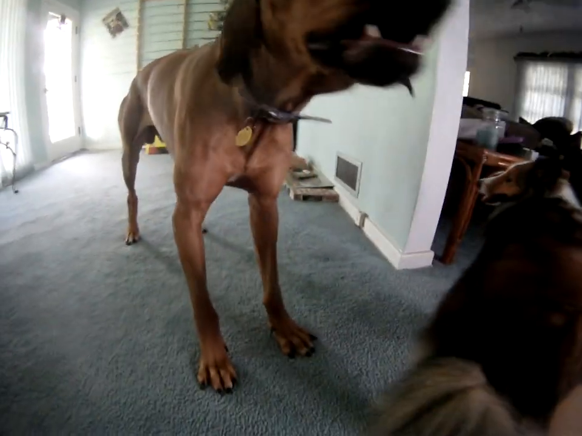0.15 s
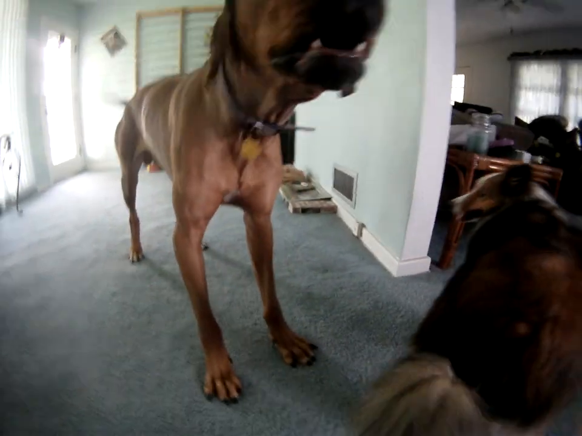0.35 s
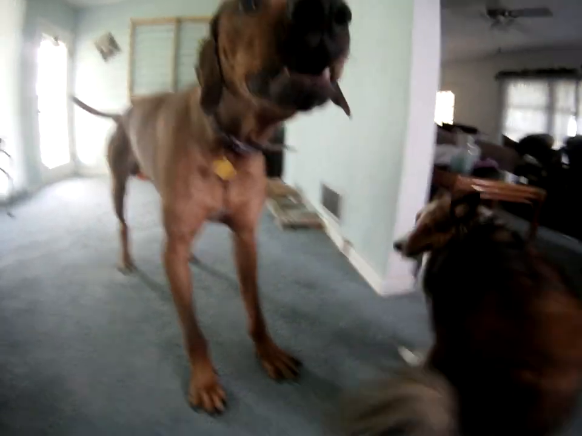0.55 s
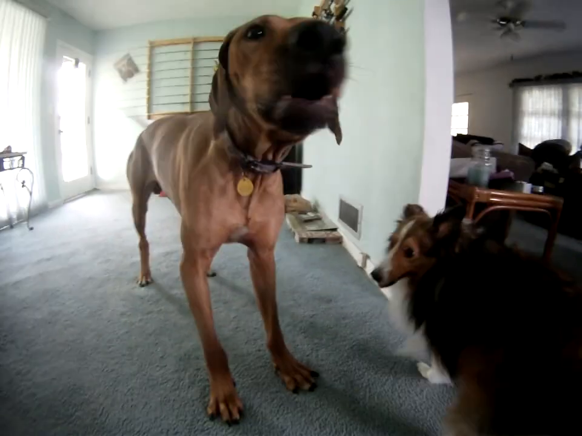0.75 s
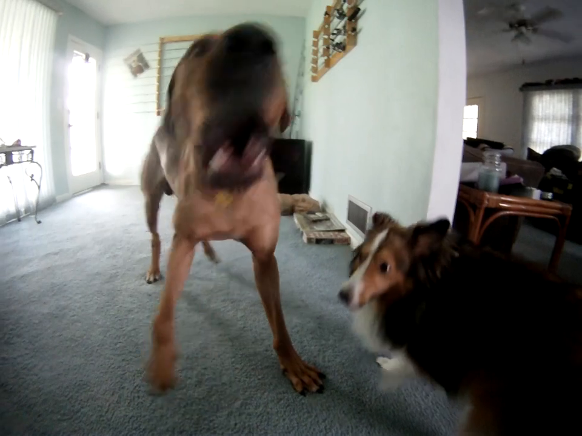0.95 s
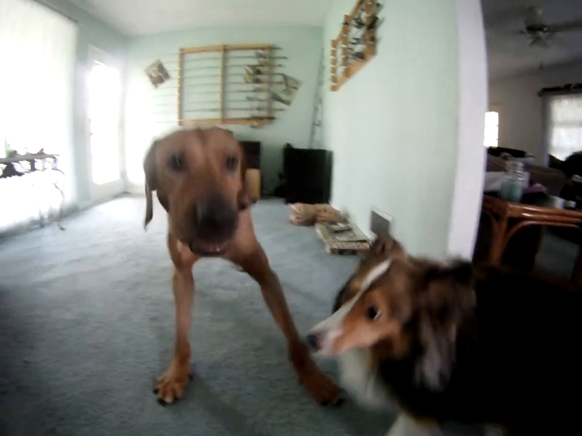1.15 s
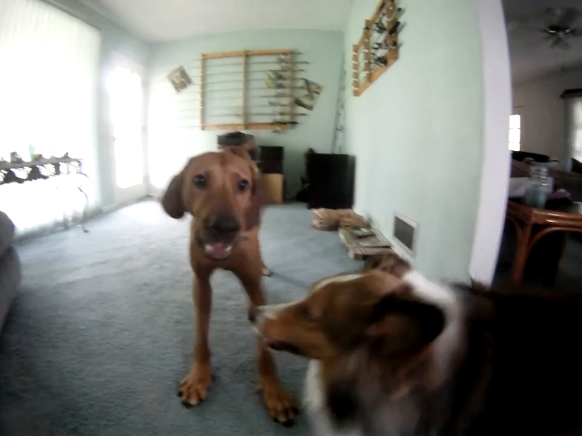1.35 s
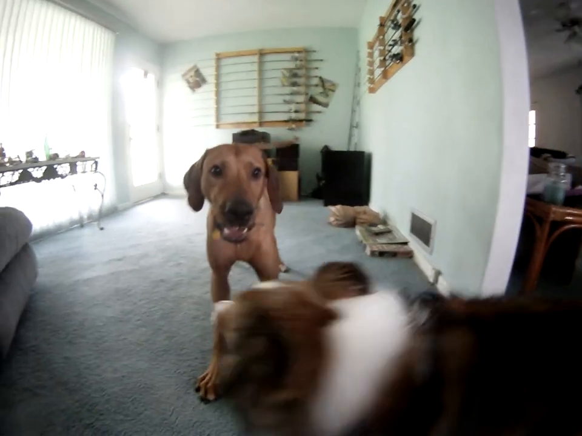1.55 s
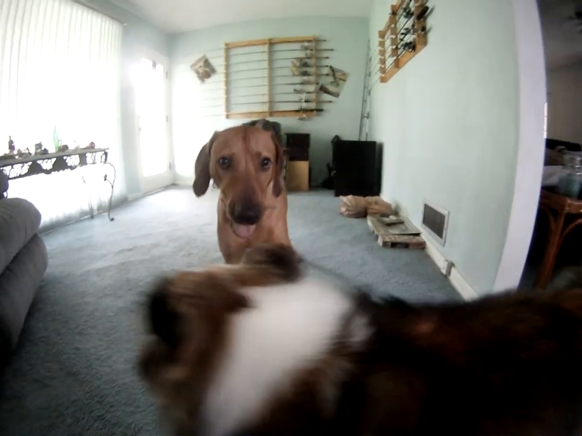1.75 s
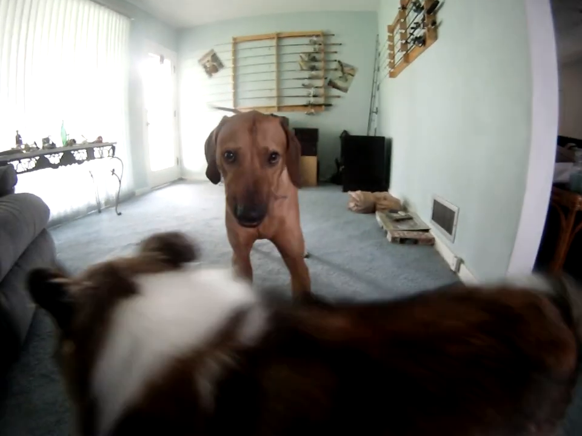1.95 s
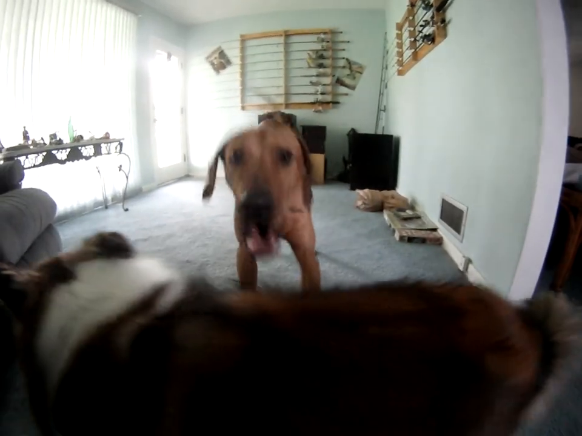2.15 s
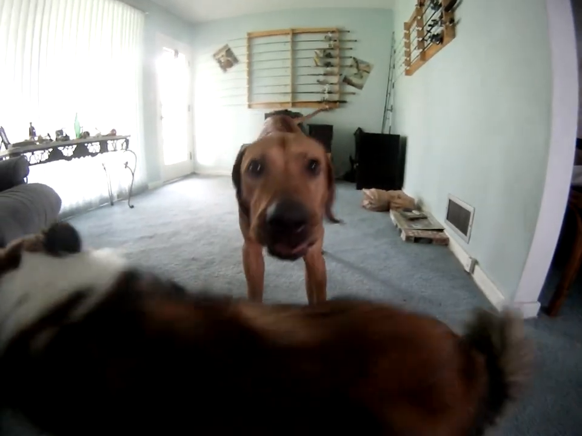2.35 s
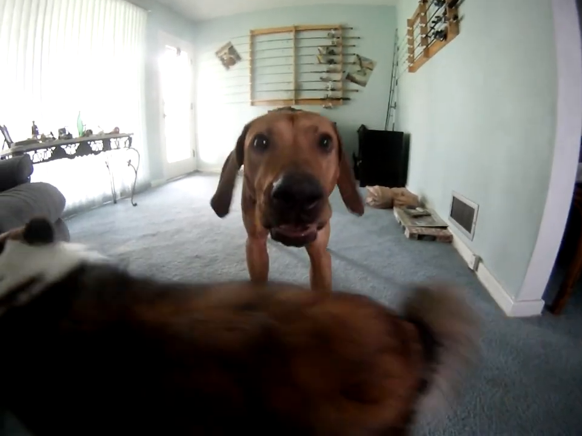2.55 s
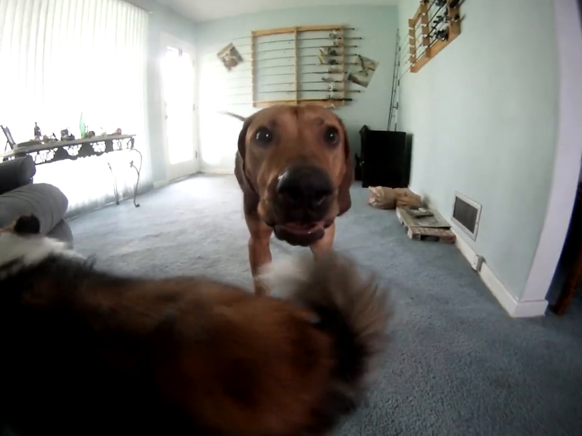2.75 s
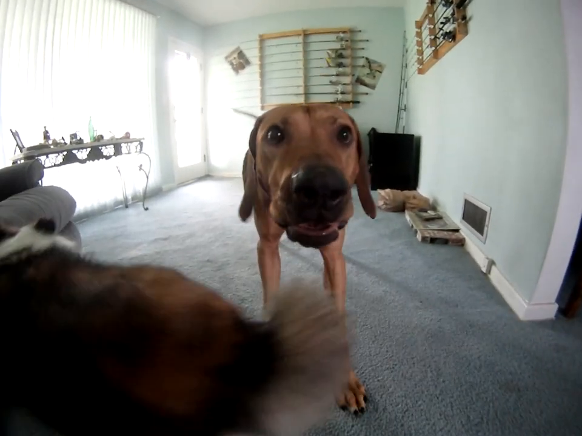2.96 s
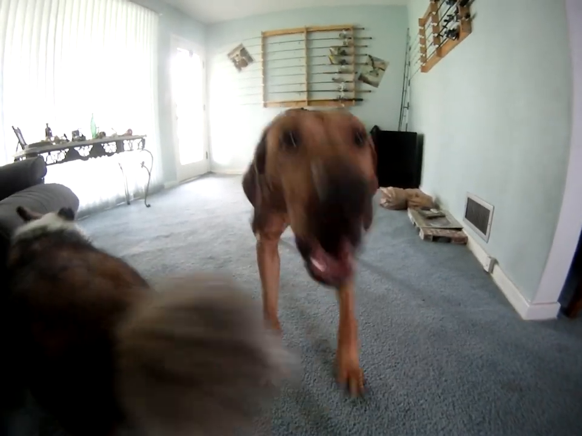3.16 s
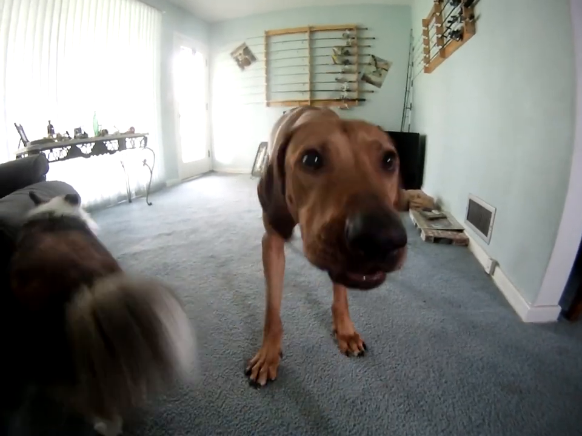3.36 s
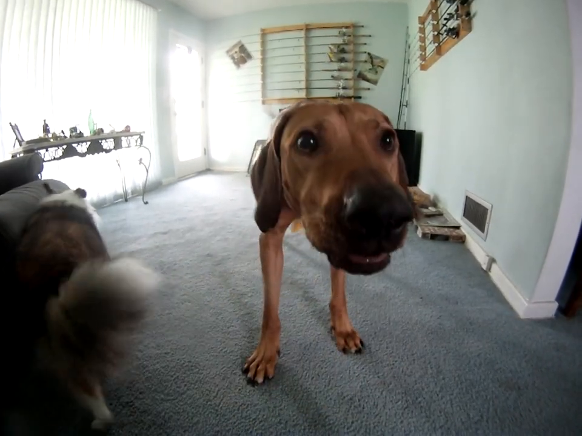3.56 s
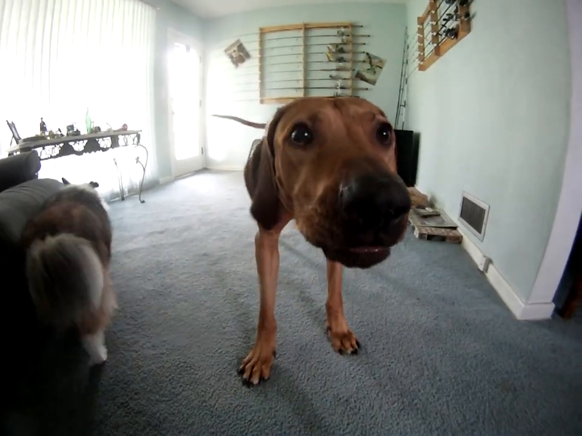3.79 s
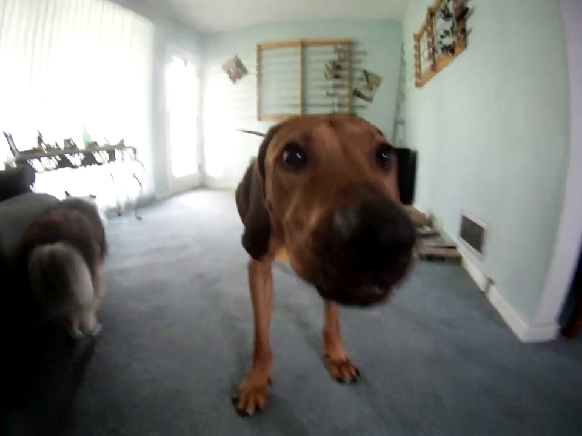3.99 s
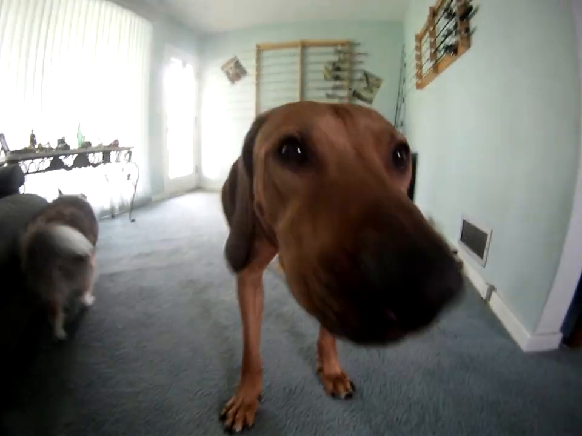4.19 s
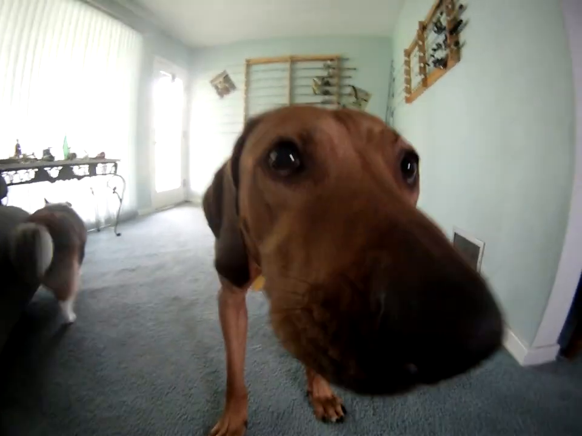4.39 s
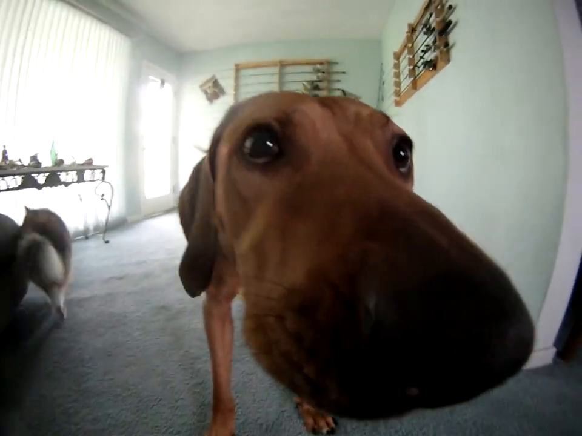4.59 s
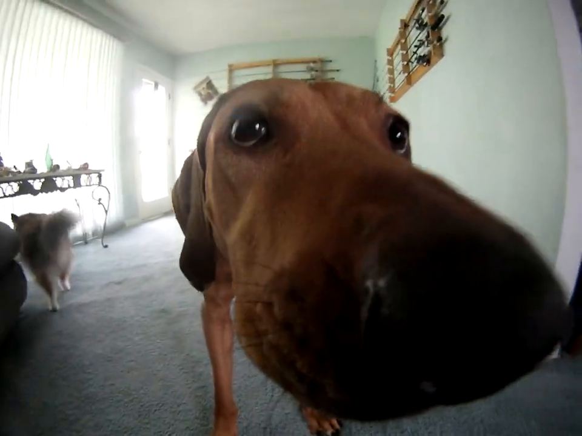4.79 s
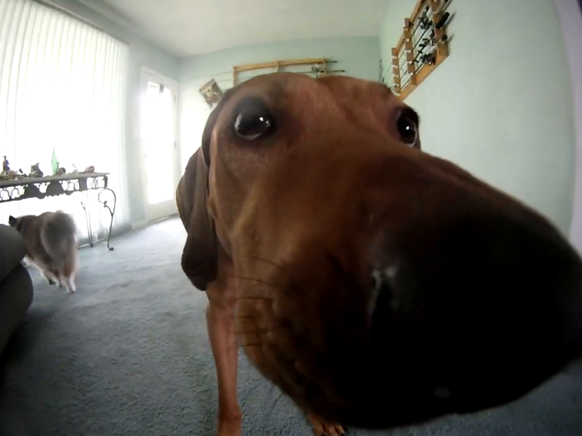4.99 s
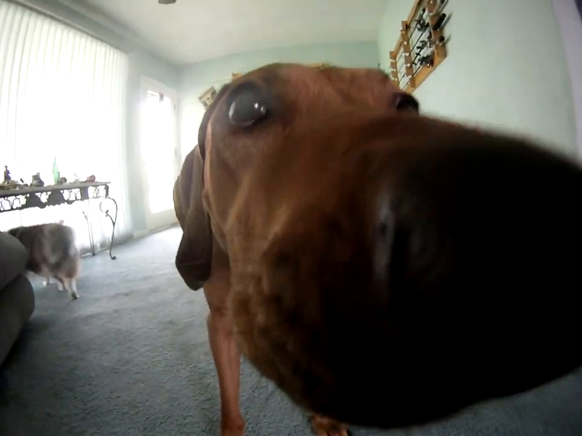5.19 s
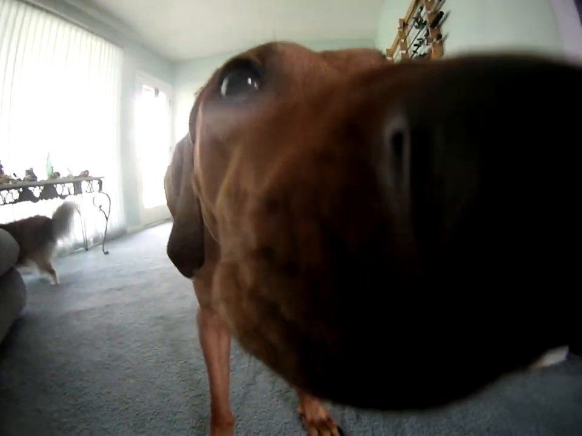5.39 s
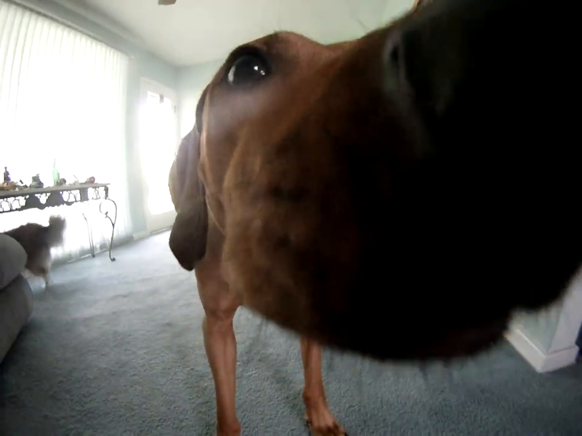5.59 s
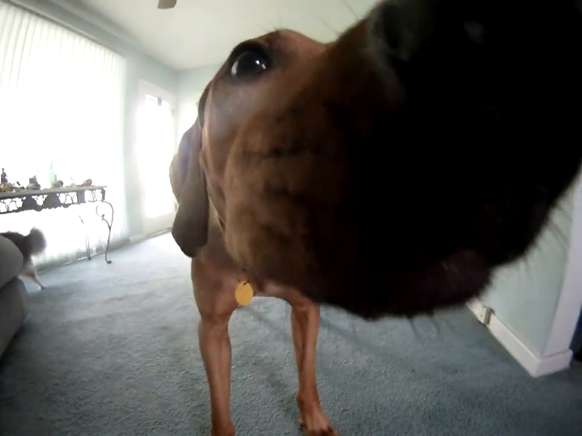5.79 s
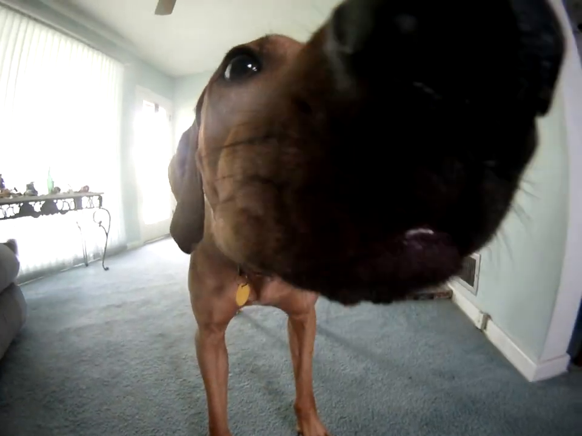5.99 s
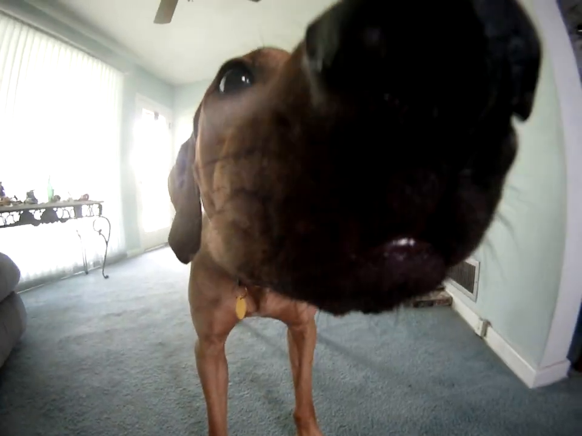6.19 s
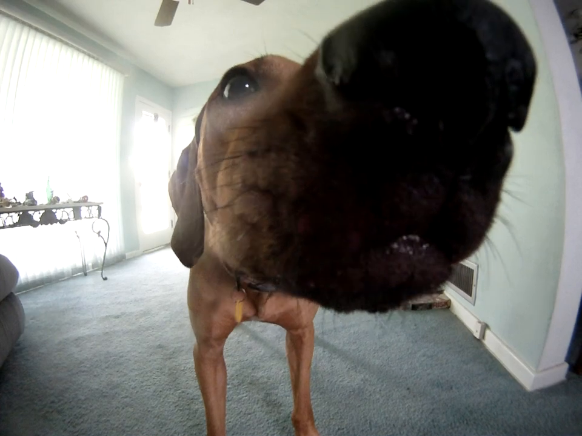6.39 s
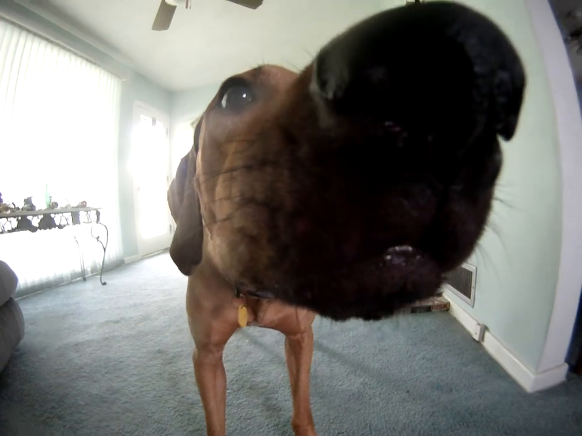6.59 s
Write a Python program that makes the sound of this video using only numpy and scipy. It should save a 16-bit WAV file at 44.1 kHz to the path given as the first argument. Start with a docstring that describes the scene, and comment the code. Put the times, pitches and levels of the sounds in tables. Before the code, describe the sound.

From 0 to about 0.7 s a hand rubs a small hand-held camera: dense gritty rustle with low rumble and soft bumps, easing at 0.3 s as hollow plastic creaks and ticks cluster until 0.6 s. At 0.93 s a big hound gives a rough, snarling bark under 0.2 s long, its pitch rising then dropping, followed by a breathy huff near 1.15 s. A faint low grumble at 2.1 s leads into a second, higher bark at 2.15 s with brief overload crackles and a huff. The third bark, at 3.14 s, cracks harshly and ends in another huff near 3.35 s. The carpeted living room adds a short tail. Then quiet hiss and rumble, faint sniffs near 4.4 and 5.5 s, barely audible ticks from 4.05 s and clearer ones at 5.2, 5.7, 6.1 and 6.3 s. The camera microphone sounds coarse, with gritty treble.

```python
"""A hand rubs over a small hand-held camera: gritty rustle, low rumble, bumps, creaks and ticks of the case.
Then a big hound barks three times across a carpeted living room; vocal-fold pulses and breath ring its
throat, mouth and bared teeth, with huffs of air around each bark, a grumble before the second and overload
cracks on the last two. Later two faint sniffs come at the lens, and the case ticks again. The microphone sits
in the camera, which samples coarsely and holds each sample: the low band is mirrored into a gritty treble."""
import sys
import numpy as np
from scipy import signal
from scipy.fft import rfft, irfft
from scipy.io import wavfile
from scipy.ndimage import uniform_filter1d

SR = 44100
rng = np.random.default_rng(int(sys.argv[2]) if len(sys.argv) > 2 else 0)


def generate_wav(signal):
    """Clip the signal to [-1, 1] and save it as 16-bit WAV at the path in sys.argv[1]."""
    frames = np.transpose(np.atleast_2d(signal))
    scaled = np.clip(frames, -1, 1) * 32767
    pcm = np.round(scaled).astype(np.int16)
    wavfile.write(sys.argv[1], SR, pcm)


N = 292824
TIME = np.arange(N) / SR

# In every resonance table width_hz is that of one filter pass; each resonance is passed twice.
# In every spectrum level_db is relative, because the coloured sound is scaled to rms 1.

# Spectrum of the rustle on the case: hz, level_db
RUSTLE_SPECTRUM = [(120, -35), (200, -13), (272, -15.5), (484, 3), (726, 0.5), (1110, -4.5), (1480, 0.5),
                   (1760, -5), (2320, 1.5), (2950, -14), (3640, -8), (4430, -21), (5310, -22.5),
                   (5700, -28), (7410, -62), (12500, -120)]
# Spectrum of the moving hand's rumble: hz, level_db
RUMBLE_SPECTRUM = [(20, -23), (40, -5), (100, -6.5), (160, -11), (300, -14), (800, -30), (4500, -58.5),
                   (5700, -75.5)]
# Moments when the sliding hand presses harder: peak_s, spread_s, added_level_db
HAND_PRESSES = [(0.015, 0.052, 4), (0.22, 0.013, 5)]
# Soft bumps of the hand: start_s, pitch_hz, level_db
HAND_BUMPS = [(0.242, 83.6, -20.5), (0.343, 110, -39), (0.426, 122, -30), (0.486, 90.5, -29)]
# Spectrum of the room tone: hz, level_db
ROOM_TONE_SPECTRUM = [(12, -28.5), (20, -3), (65, -5), (97, -5.5), (123, -7.5), (287, -12), (331, -15.5),
                      (363, -15), (390, -15), (596, -17.5), (1270, -22), (2630, -24.5), (5600, -30.5),
                      (7280, -62.5), (12300, -120)]
# Creaks and ticks of the case, levels before the trims in ticks():
# start_s, scrape_peak_db, ring_peak_db, ring_pitch_hz, slip_length_s
CASE_TICKS = [(0.326, -14.5, -18, 686, 0.0022), (0.3363, -16.5, -31, 620, 0.00077),
              (0.3823, -14, -18, 645, 0.0041), (0.409, -23, -23.5, 487, 0.0017),
              (0.4253, -19, -23, 734, 0.00099), (0.464, -11.5, -21.5, 670, 0.00091),
              (0.4934, -12.5, -26.5, 634, 0.0013), (0.5153, -22, -28.5, 617, 0.0017),
              (0.5218, -37, -20.5, 510, 0.0015), (0.5623, -16.5, -19.5, 530, 0.0019),
              (0.616, -19.5, -18.5, 550, 0.0026), (4.055, -46.5, -48, 798, 0.0017),
              (4.256, -50, -51.5, 820, 0.0017), (4.3554, -46.5, -49.5, 510, 0.0014),
              (4.9336, -47.5, -47.5, 516, 0.0016), (5.1588, -38, -42, 610, 0.0004),
              (5.22, -25, -39.5, 670, 0.0024), (5.2944, -31.5, -44.5, 610, 0.0018),
              (5.398, -54.5, -48.5, 960, 0.0017), (5.4292, -34.5, -58, 614, 0.0016),
              (5.4497, -41, -67, 696, 0.0011), (5.4869, -52, -66, 715, 0.0019),
              (5.7006, -20, -33, 776, 0.0034), (6.0906, -28, -42, 600, 0.0012),
              (6.2791, -28, -35.5, 480, 0.0036)]
# Resonances of the case's shell, before the scatter from tick to tick: pitch_hz, width_hz, level_db
CASE_SHELL = [(480, 110, -4), (780, 780, -12), (1228, 250, 1), (1744, 390, -2), (2003, 164, -5),
              (2610, 190, -6), (3524, 410, -6.5), (3920, 200, -18), (5080, 210, -22)]
# Air through mouth and nose: peak_s, rise_s, fall_s, level_db, throat_share_db
BREATH_HUFFS = [(0.89, 0.032, 0.017, -55, -17.5), (1.152, 0.022, 0.056, -28.5, -11.5),
                (1.47, 0.061, 0.018, -57, -15), (2.084, .025, 0.031, -52, 5),
                (2.351, 0.037, 0.035, -29.5, -8), (3.11, .04, 0.033, -65, -17.5),
                (3.35, 0.038, 0.039, -28.5, -8.5)]
# Resonances of the open airway: pitch_hz, width_hz, level_db
AIRWAY_RESONANCES = [(870, 160, -8.5), (1360, 200, -0.5), (1770, 340, -5), (2177, 280, 3),
                     (3130, 1100, -14), (4600, 370, -24.5)]
# Barks: start_s, attack_s, climax_after_s, length_s, first_pitch_hz, top_pitch_hz, rough_after_climax (0-1),
# throat_db, open_mouth_db, snarl_db, rasp_db, snarl_tuning (ratio)
BARK_EVENTS = [(0.929, 0.026, 0.11, 0.174, 205.3, 389.7, 0.65, -16.5, -11.5, -5.5, -24.5, 1),
               (2.151, 0.02, 0.084, 0.158, 298.5, 432, 0.55, -14, -15, -14, -32.5, 1),
               (3.144, 0.017, 0.075, 0.146, 265.2, 408, 0.25, -14, -15.5, -7, -25, 1.04)]
# Resonances of the throat: pitch_hz, width_hz, level_db
THROAT_RESONANCES = [(204, 35, -29), (384.2, 52, -5.5), (460.6, 80, 1), (753, 100, -7.5),
                     (818.4, 100, -8.5)]
# Resonances of the open mouth: pitch_hz, width_hz, level_db
MOUTH_RESONANCES = [(1214.4, 70, -7.5), (1353, 430, 2), (1570, 120, -4.5), (1850, 110, 1)]
# Resonances behind bared teeth, before each bark's tuning: pitch_hz, width_hz, level_db
SNARL_RESONANCES = [(2088, 150, 3), (2270, 62, -13.5)]
# Rasp of the wide-open mouth, before its peaks waver: pitch_hz, width_hz, level_db
RASP_RESONANCES = [(2510, 210, 4.5), (3070, 320, -2.5), (3290, 440, -12.5), (4030, 67, -3.5),
                   (4260, 210, -14.5), (5180, 690, -10)]
# Low grumble leading into the second bark: time_s, pitch_hz, level_db
GRUMBLE_PATH = [(2.03, 161, -96), (2.06, 161, -51), (2.1, 165, -60), (2.125, 202, -48), (2.155, 219, -37.5),
                (2.175, 260, -86.5)]
# Overload cracks at the height of a bark: peak_s, level_db
OVERLOAD_CRACKS = [(2.219, -20.5), (2.2331, -17.5), (3.224, -9)]
# Spectrum of an overload crack: hz, level_db
CRACK_SPECTRUM = [(60, -38.5), (250, -28.5), (420, 0), (1700, -3), (3000, -6), (5500, -17)]
# Sniffs at the lens: peak_s, rise_s, fall_s, level_db
NOSE_SNIFFS = [(4.41, 0.059, 0.028, -65), (5.47, 0.024, 0.057, -59.5)]
# Spectrum of the sniffing: hz, level_db
SNIFF_SPECTRUM = [(150, -20.5), (500, 7), (1300, -1), (2300, -4.5), (3600, -4.5), (5500, -17)]
# Standing waves of the room: pitch_hz, width_hz, level_db
STANDING_WAVES = [(361, 20, -7.5), (437, 34, -5.5), (1385, 21, -14.5), (2255, 49, -12.5)]
# Spectrum of the walls' answer: hz, level_db
WALL_SPECTRUM = [(150, 0), (420, -3.5), (600, -3), (820, -3.5), (1020, -2.5), (1340, 5), (1800, -6),
                 (2250, -1), (2750, -2.5), (3200, -2.5), (5500, -3.5)]

# The hand slides ever more quietly, grips the camera, lets go and lifts off
GRIP_S, LET_GO_S, CHANGE_S, LIFT_S = 0.29, 0.528, 0.0049, 0.68
SLIDE_DB, SLOWING_DB_PER_S, GRIP_RUSTLE_DB, LOOSE_RUSTLE_DB = -32.5, -3.5, -4.5, -15
RUMBLE_DB, GRIP_RUMBLE_DB, LOOSE_RUMBLE_DB = -45, 5.5, -9.5
ROOM_TONE_DB = -60
# The push of the chest climbs from below, sags after the climax and is released at the end
ONSET_DB, SAG_DB_PER_S, RELEASE_DB_PER_S = -41, 109, 399.5
# The folds tighten up to the climax, hold, then go slack; they are roughest while tightening
SLACK_HZ, SLACKEN_BEFORE_S, SLACKEN_AFTER_S = 169.96, 0.015, 0.055
START_ROUGH, STRAIN_ROUGH, SETTLE_S = 0.5, 0.85, 0.018
# The jaw is widest at the climax; a closed mouth muffles the upper resonances
JAW_OPEN_S, JAW_CLOSE_S, CLOSED_DB = 0.08, 0.035, -10
# The teeth are bare at the start of a bark, and the lips slowly cover them
COVER_DB_PER_S = 110
# After the release the slack folds hum through the closing mouth
HUM_DB, HUM_AFTER_S, HUM_FADE_S = -42.5, 0.018, 0.02
# The camera's sampling rate, the filter ahead of it and the upper limit after it
CAMERA_HZ, GUARD_HZ, TOP_HZ = 12000, 5650, 15400


def undb(db):
    """Decibels to gain."""
    return 10 ** (np.asarray(db) / 20)


def unit(x):
    """Scale to rms 1."""
    return x / np.sqrt(np.mean(x ** 2))


def steady(x, size=900):
    """Hold the running rms near 1 over a window of `size` samples."""
    return x / np.sqrt(uniform_filter1d(x ** 2, size) + 1e-12)


def curves(rows):
    """Each column after the first, as a control over time."""
    times, *columns = np.transpose(rows)
    return [np.interp(TIME, times, column) for column in columns]


def walk(rate):
    """Random control of spread near 1: straight lines between `rate` random points a second."""
    return 1.2 * np.interp(TIME * rate, np.arange(N), rng.standard_normal(N))


def puff(peak_s, rise_s, fall_s):
    """A swell to 1 at its peak that dies away, bell-shaped on either side."""
    spread = np.where(TIME < peak_s, rise_s, fall_s)
    return np.exp(-.5 * ((TIME - peak_s) / spread) ** 2)


def resonate(x, modes):
    """Parallel resonances, each applied twice for dark valleys."""
    out = 0
    for hz, width, db in modes:
        b, a = signal.iirpeak(hz, hz / width, fs=SR)
        once = signal.lfilter(b, a, x)
        out = out + undb(db) * signal.lfilter(b, a, once)
    return out


def colour(x, points):
    """Give a sound a spectrum, drawn over log frequency, at rms 1."""
    hz, db = np.transpose(points)
    freqs = np.maximum(np.fft.rfftfreq(N, 1 / SR), 1)
    gain = undb(np.interp(np.log(freqs), np.log(hz), db))
    return unit(irfft(rfft(x) * gain, N))


def slips(count, spread_db):
    """Stick-slip friction: dense clicks whose size jumps every 16 samples."""
    sizes = np.repeat(rng.standard_normal(count // 16 + 1), 16)[:count]
    return rng.standard_normal(count) * undb(spread_db * sizes)


def rubbing(flutter_db=1.0, surge_db=0.86, bump_s=0.0056):
    """Gritty, fluttering friction on the case, with the rumble and bumps of the moving hand."""
    grip, loose = ((1 + np.tanh((TIME - s) / CHANGE_S)) / 2 for s in (GRIP_S, LET_GO_S))
    rustle_db = SLIDE_DB + SLOWING_DB_PER_S * np.minimum(TIME, LIFT_S)
    rustle_db = rustle_db + GRIP_RUSTLE_DB * grip + LOOSE_RUSTLE_DB * loose
    rustle_db = rustle_db + sum(db * puff(s, spread, spread) for s, spread, db in HAND_PRESSES)
    rustle_db = rustle_db + flutter_db * walk(117.3) + surge_db * walk(26)
    rustle = colour(slips(N, 3.7), RUSTLE_SPECTRUM) * undb(rustle_db)

    rumble_db = RUMBLE_DB + GRIP_RUMBLE_DB * grip + LOOSE_RUMBLE_DB * loose
    rumble = colour(rng.standard_normal(N), RUMBLE_SPECTRUM) * undb(rumble_db)
    for s, hz, db in HAND_BUMPS:
        age = np.maximum(TIME - s, 0)
        rumble = rumble + undb(db) * np.sin(2 * np.pi * hz * age) * np.exp(-age / bump_s)
    lift = np.clip((LIFT_S - TIME) / 0.055, 0, 1)
    return (rustle + rumble) * lift


def room_tone():
    """Low rumble and soft hiss, wavering a little."""
    return colour(rng.standard_normal(N), ROOM_TONE_SPECTRUM) * undb(ROOM_TONE_DB + 0.42 * walk(10))


def ticks(ring_gain_db=-2.0, scrape_gain_db=-13, hollow_hz=565, hollow_db=1, place_db=2, count=4096):
    """A brief slip rattles the shell and leaves the hollow of the case ringing."""
    out, age = np.zeros(N + count), TIME[:count]
    for s, scrape_db, ring_db, hz, length in CASE_TICKS:
        burst = slips(count, 6) * age / length * np.exp(-age / length)
        hollow = [(hollow_hz, 110, hollow_db), (hz, 300, 0)]
        # each place of contact favours other modes
        shell = [(f, width, db + place_db * rng.standard_normal()) for f, width, db in CASE_SHELL]
        start = int(s * SR)
        for modes, db in ((hollow, ring_db + ring_gain_db), (shell, scrape_db + scrape_gain_db)):
            ring = resonate(burst, modes)
            loudest = np.sqrt(uniform_filter1d(ring ** 2, size=441).max())  # rms over 10 ms
            out[start:start + count] += undb(db) * ring / loudest
    return out[:N]


def huffs(lips_hz=2520, sweep=0.1, sweep_s=0.057, lips_db=-4.5):
    """The hound's unvoiced air before and after each bark; one resonance climbs as the lips move."""
    air = rng.standard_normal(N) * undb(2.5 * walk(120))
    airway = steady(resonate(air, AIRWAY_RESONANCES))
    throat = steady(resonate(air, THROAT_RESONANCES))
    flutter = steady(signal.sosfilt(signal.butter(4, 200, fs=SR, output="sos"), air))
    out = 0
    for s, rise, fall, db, throat_db in BREATH_HUFFS:
        hz = lips_hz * (1 + sweep * np.tanh((TIME - s) / sweep_s))
        # slow noise on a gliding tone makes a narrow band of noise
        lips = flutter * np.sin(2 * np.pi * np.cumsum(hz) / SR)
        breath = .7 * airway + undb(lips_db) * lips + undb(throat_db) * throat
        out = out + undb(db) * puff(s, rise, fall) * breath
    return out


def folds():
    """Pitch and roughness: a ragged climb to the climax, a hold, and a drop as the folds slacken."""
    points = []
    for start, _, climax, length, first_hz, top_hz, rough, *_ in BARK_EVENTS:
        points += [(start, first_hz, START_ROUGH),
                   (start + climax / 2, (first_hz + top_hz) / 2, STRAIN_ROUGH),
                   (start + climax, top_hz, STRAIN_ROUGH),
                   (start + climax + SETTLE_S, top_hz, rough),
                   (start + length - SLACKEN_BEFORE_S, top_hz, rough),
                   (start + length + SLACKEN_AFTER_S, SLACK_HZ, START_ROUGH)]
    return curves(sorted(points))


def bark(source, throat, mouth, rasp, hum, row):
    """One push of the chest: teeth bared at first, the jaw opens wide and closes, and a low hum is left."""
    start, attack, climax, length, *_, throat_db, mouth_db, snarl_db, rasp_db, tuning = row
    teeth = [(hz * tuning, width, db) for hz, width, db in SNARL_RESONANCES]
    snarl = steady(resonate(source, teeth))
    age = np.maximum(TIME - start, 0)
    push_db = ONSET_DB * np.exp(-age / attack)
    push_db = push_db - SAG_DB_PER_S * np.maximum(age - climax, 0)
    push_db = push_db - RELEASE_DB_PER_S * np.maximum(age - length, 0)
    gape = undb(CLOSED_DB * (1 - puff(start + climax, JAW_OPEN_S, JAW_CLOSE_S)))
    voice = undb(throat_db) * throat
    voice = voice + gape * (undb(mouth_db) * mouth + undb(rasp_db) * rasp)
    voice = voice + undb(snarl_db - COVER_DB_PER_S * age) * snarl
    trail = undb(HUM_DB) * hum * puff(start + length + HUM_AFTER_S, HUM_FADE_S, HUM_FADE_S)
    return voice * undb(push_db) * np.clip(age / .02, 0, 1) + trail


def barks(jitter=.1, shimmer_db=5, breath=1.):
    """Ragged vocal-fold pulses and puffs of air ring the throat, mouth and teeth; the pitch rises and falls."""
    hz, rough = folds()
    phase = np.cumsum(hz * (1 + jitter * rough * walk(400))) / SR  # in cycles
    pulses = unit(np.diff(np.floor(phase), prepend=0)) * undb(shimmer_db * rough * walk(250))
    air = unit(rng.standard_normal(N) * np.exp(-(phase % 1) / .45))  # air escapes once a cycle
    source = pulses + breath * rough * air
    throat = steady(resonate(source, THROAT_RESONANCES))
    mouth = steady(resonate(source, MOUTH_RESONANCES))
    # tongue and lips shift the balance of the rasp's peaks
    rasp = steady(sum(resonate(source, [mode]) * undb(4.5 * walk(45)) for mode in RASP_RESONANCES))
    hum = unit(np.sin(2 * np.pi * phase))
    out = sum(bark(source, throat, mouth, rasp, hum, row) for row in BARK_EVENTS)
    return out * undb(1.1 * rough * walk(140))  # the folds flap in uneven bursts


def grumble():
    """Closed-mouth voice: a wobbling fundamental with a weak octave."""
    hz, db = curves(GRUMBLE_PATH)
    phase = 2 * np.pi * np.cumsum(hz * (1 + 0.042 * walk(150))) / SR
    voice = unit(np.sin(phase) + 0.35 * np.sin(2 * phase))
    sounding = (TIME > GRUMBLE_PATH[0][0]) * (TIME < GRUMBLE_PATH[-1][0])
    return voice * undb(db) * sounding


def overload_cracks(rise=0.0012, fall=0.0012):
    """The loudest barks overload the microphone: a few milliseconds of harsh, unpitched crackle."""
    harsh = steady(colour(rng.standard_normal(N), CRACK_SPECTRUM), size=300)
    return harsh * sum(undb(db) * puff(s, rise, fall) for s, db in OVERLOAD_CRACKS)


def living_room(x, t60=0.42, wall_db=-12.0, first_s=.012):
    """Standing waves ring on, and the walls return a dense tail that the carpet soon swallows."""
    # the tail builds up over first_s and falls 60 dB in t60 seconds
    decay = np.exp(-np.log(1000) * TIME / t60) * (1 - np.exp(-(TIME / first_s) ** 2))
    tail = (colour(rng.standard_normal(N), WALL_SPECTRUM) * decay)[:SR]
    walls = signal.fftconvolve(x, tail / np.linalg.norm(tail))[:N]
    return x + resonate(x, STANDING_WAVES) + undb(wall_db) * walls


def sniffs():
    """Air flutters through wet nostrils right at the lens."""
    air = colour(slips(N, 3.92), SNIFF_SPECTRUM) * undb(2.2 * walk(83))
    return air * sum(undb(db) * puff(s, rise, fall) for s, rise, fall, db in NOSE_SNIFFS)


def scene():
    """The barks and their cracks pass through the room; hand, case, nose and room tone are added dry."""
    dry_layers = rubbing() + room_tone() + ticks() + sniffs()
    in_room = living_room(huffs() + barks() + grumble() + overload_cracks())
    return (dry_layers + in_room)[None]


def record(dry):
    """Each coarse sample is held four times over, so the low band reappears mirrored around the sampling rate."""
    guard = signal.ellip(6, .3, 45, GUARD_HZ, fs=SR, output="sos")
    guarded = signal.sosfilt(guard, dry)
    coarse = np.clip(signal.resample_poly(guarded, CAMERA_HZ, SR, axis=1), -1, 1)
    stairs = np.repeat(coarse, 4, axis=1)
    held = signal.resample_poly(stairs, SR, 4 * CAMERA_HZ, axis=1)[:, :N]
    top = signal.ellip(8, .2, 90, TOP_HZ, fs=SR, output="sos")
    return signal.sosfilt(top, held)


dry = scene()
out = record(dry)
generate_wav(out)
```